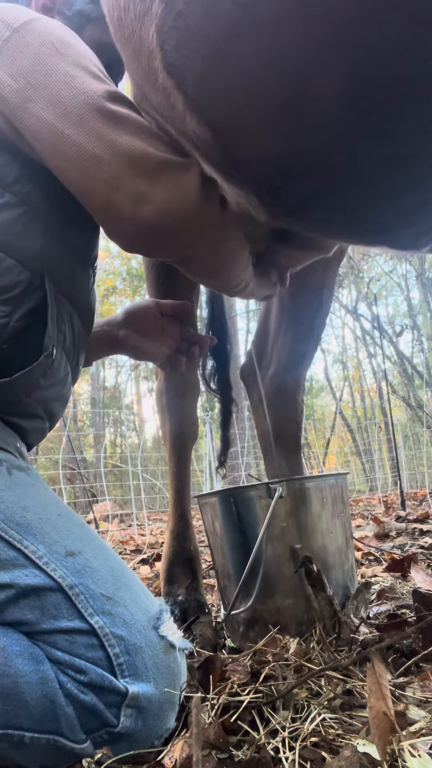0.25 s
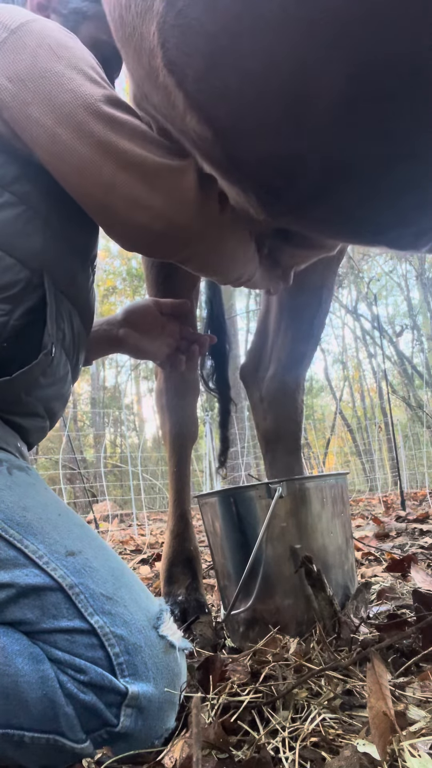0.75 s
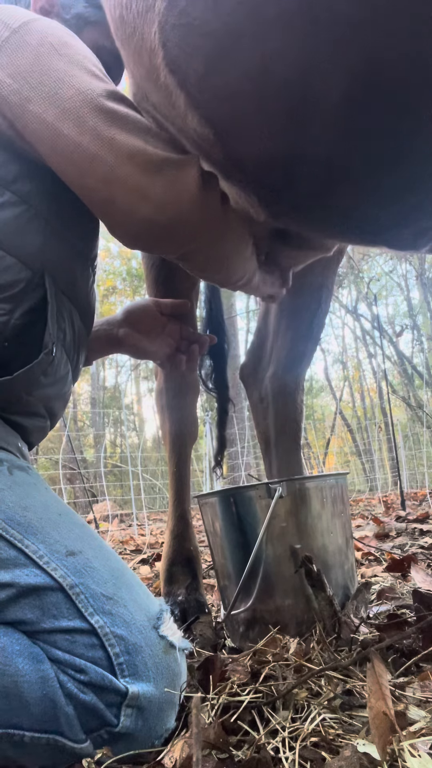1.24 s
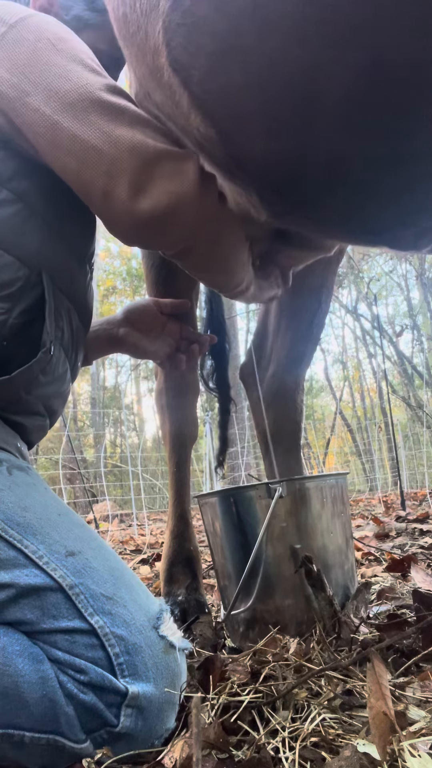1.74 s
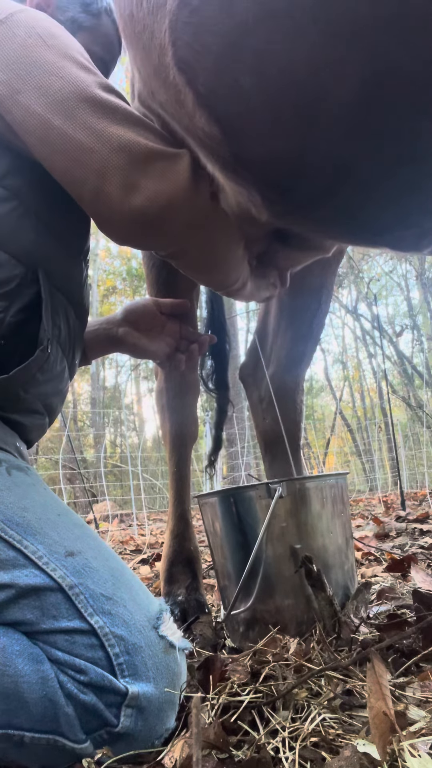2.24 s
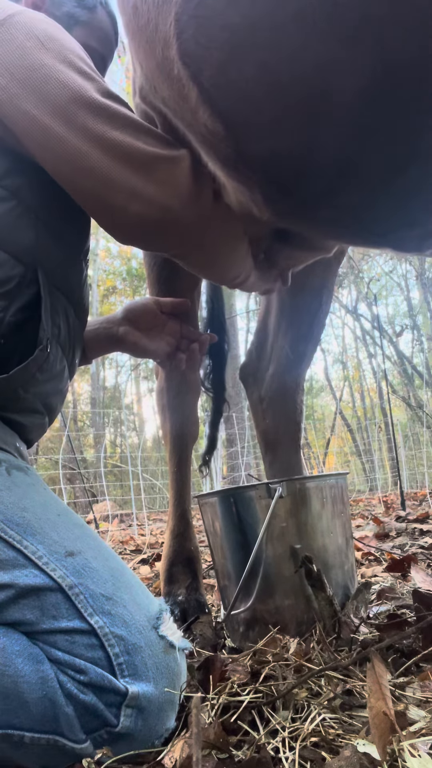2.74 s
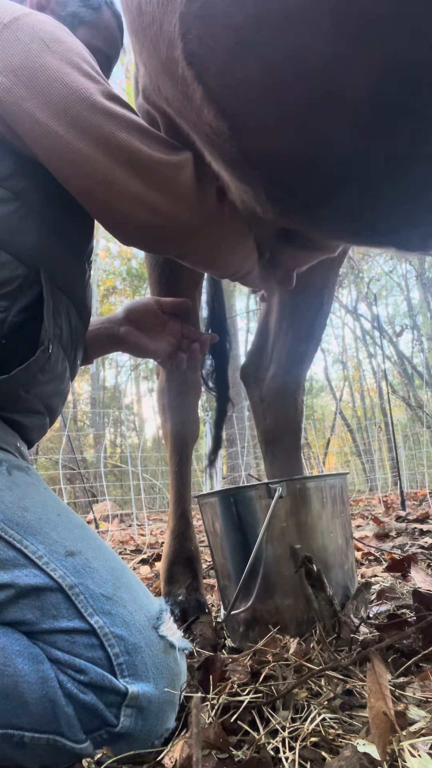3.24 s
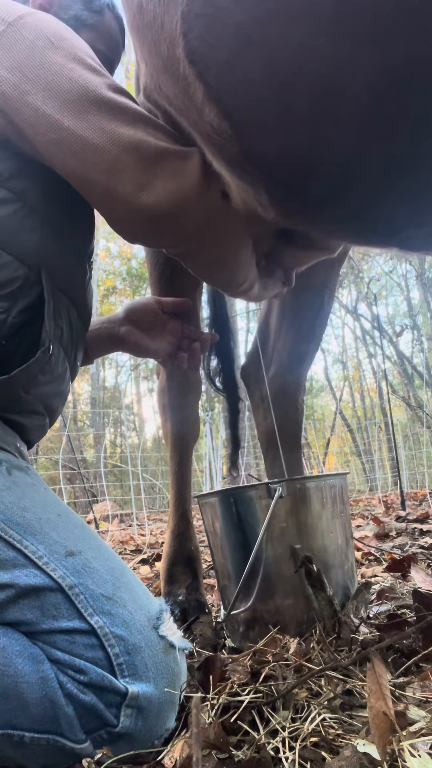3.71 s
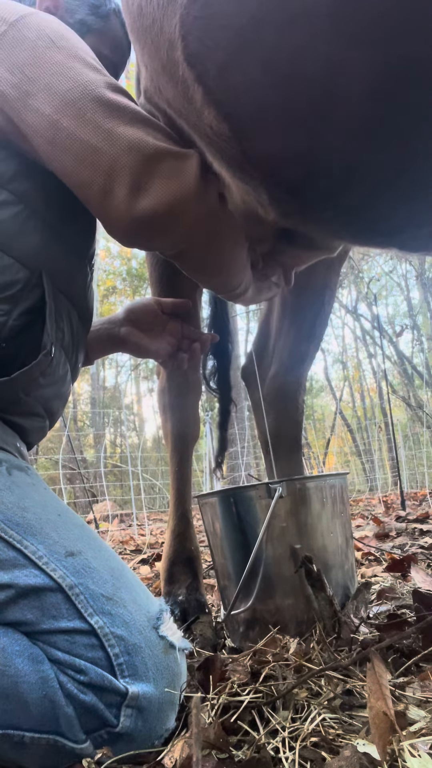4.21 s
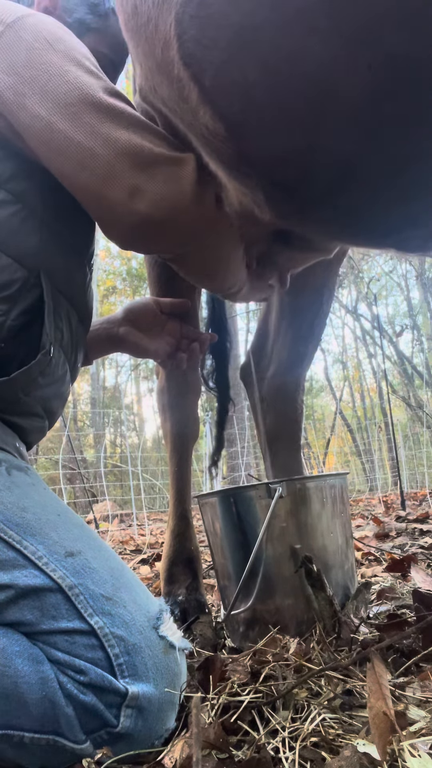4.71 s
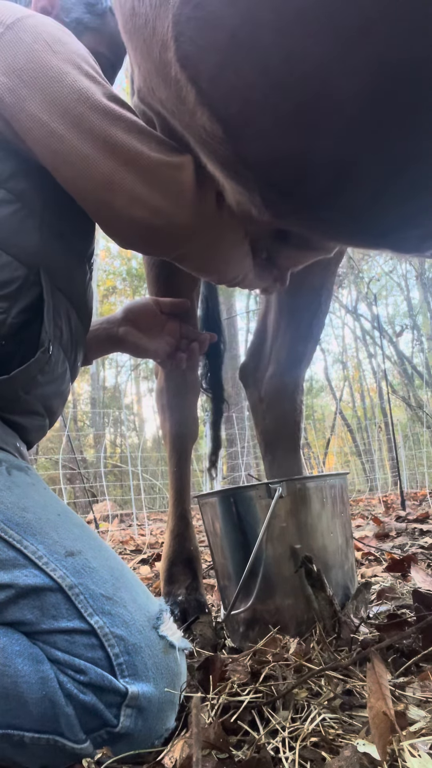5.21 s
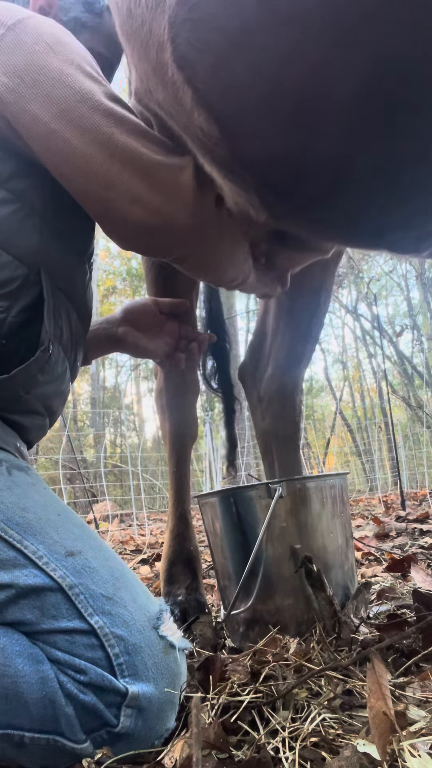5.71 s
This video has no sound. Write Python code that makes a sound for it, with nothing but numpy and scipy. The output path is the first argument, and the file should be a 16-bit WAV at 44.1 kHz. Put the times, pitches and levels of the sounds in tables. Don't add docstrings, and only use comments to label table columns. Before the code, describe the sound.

Jets of milk squirt rhythmically into a metal pail, each hissing, slapping the steel wall and ending in a hollow gurgle, outdoors in a quiet wood.

```python
import sys
import numpy as np
from scipy import signal
from scipy.fft import rfft, irfft, next_fast_len
from scipy.io import wavfile
from scipy.ndimage import uniform_filter1d

SR = 44100
rng = np.random.default_rng(int(sys.argv[2]) if len(sys.argv) > 2 else 0)


def to_wav(sig):
    pcm = np.clip(np.atleast_2d(sig), -1, 1) * 32767
    pcm = np.round(pcm).astype(np.int16)
    wavfile.write(sys.argv[1], SR, pcm.T)


def gain_from_db(level_db):
    decades = np.asarray(level_db, float) / 20
    return 10 ** decades


N = 262836

# hz, level_db
WOOD_COLOUR = [(100, -0.5), (160, 4), (500, -21.5), (1000, -14), (1700, -23.5), (2600, -7.5), (3200, -9.5),
               (3900, -7.5), (4700, -11.5), (8000, -19), (15500, -18)]
# time_s, level_db
WOOD_LEVEL = [(0, -54), (.2, -59), (.85, -69), (1.5, -65), (2.1, -61), (2.75, -63.5), (3.4, -62), (4, -67),
              (4.65, -67.5), (5.3, -66.5), (5.96, -63.5)]
# hz, level_db
RUMBLE_COLOUR = [(15, -52), (27, -55), (55, -0.5), (91, 3.5), (156, -3.5), (210, -6), (260, -5.5),
                 (340, -15), (570, -120)]
# time_s, level_db
RUMBLE_LEVEL = [(0, -73), (.5, -60.5), (2.2, -61.5), (3.3, -60.5), (3.95, -54), (4.5, -61.5), (5.96, -63.5)]
# time_s, pitch_hz, level_db
BIRD_WHISTLE = [
    (1.95, 3440, -84),
    (2.02, 3560, -72),
    (2.11, 3730, -71),
    (2.19, 3830, -76),
]

# start_s, peak_db
DROPLET_TICKS = [(0.0187, -60), (0.6494, -57), (0.681, -47), (1.328, -54), (1.9794, -65), (3.5902, -23.5),
                 (3.785, -40.5), (3.8286, -55), (3.8817, -44.5), (5.352, -46), (0.692, -50), (0.712, -49.5),
                 (1.893, -39.5), (2.194, -49), (2.9236, -34.5), (4.011, -58), (5.191, -69), (5.749, -62),
                 (5.088, -43), (5.1455, -47.5), (5.7903, -48.5)]
# peak_time_s, peak_db, pitch_hz
DROPLET_SNAPS = [(0.0012, -42, 3530), (0.0025, -43.5, 740), (0.021, -43, 3590), (0.324, -39, 5200),
                 (0.5673, -38, 1730), (0.6792, -47, 1555), (1.0763, -38, 10450), (1.198, -49, 1500),
                 (1.3295, -40, 2231), (1.5984, -37, 9700), (1.737, -32, 10200), (1.828, -43, 5370),
                 (2.4934, -39, 5483), (2.926, -29.5, 9600), (3.7873, -34, 9097), (3.832, -38, 10000),
                 (4.195, -32, 1510), (4.4136, -42, 6000), (4.61, -48, 2170), (4.7396, -41, 6004),
                 (4.7938, -30.5, 9100), (4.799, -20.5, 1700), (4.8317, -30.5, 8600), (5.1468, -47, 3800),
                 (5.4047, -41, 6330), (5.791, -46.5, 4930)]
SNAP_S = 0.00082

# start_s, peak_db, pitch_hz
FROTH_BUBBLES = [(0.0, -39, 608), (0.351, -47, 650), (0.477, -44, 497), (1.052, -41, 636), (1.08, -28, 610),
                 (1.625, -33.5, 372), (1.735, -27, 362.6), (1.765, -28.5, 359.5), (2.22, -38, 1900),
                 (2.947, -39, 620), (3.119, -38.5, 494), (3.631, -38, 667), (3.779, -38, 560),
                 (4.197, -36, 514), (4.794, -43, 490), (0.02, -43, 635), (0.96, -40.5, 373),
                 (1.12, -35, 633), (1.205, -36.5, 308), (1.55, -48, 377), (1.74, -38, 626),
                 (1.79, -34.5, 330), (1.82, -51, 367), (2.0, -43, 246), (2.5, -40, 586),
                 (4.454, -45.5, 368), (5.676, -38, 349)]
# start_s, peak_db, pitch_hz
SLOW_BUMPS = [
    (2.098, -37, 153),
    (3.781, -28, 436),
    (5.111, -31, 170),
]
# start_s, peak_db, pitch_hz, ring_s
AIR_GULPS = [(0.307, -43.5, 388, 0.016), (0.411, -39, 395, 0.029), (0.449, -35.5, 450, 0.018),
             (0.489, -33, 390, 0.023), (0.514, -27, 377, 0.018), (0.544, -32.5, 396, 0.015),
             (0.569, -48, 400, 0.018), (0.616, -35.5, 377, 0.024), (0.633, -30.5, 382, 0.021),
             (1.005, -39.5, 382, 0.014), (1.084, -36.5, 293, 0.024), (1.099, -29.5, 360, 0.016),
             (1.144, -33, 362, 0.025), (1.179, -33, 322, 0.026), (2.273, -42.5, 377, 0.029),
             (2.286, -37, 387, 0.014), (2.32, -27, 375, 0.015), (2.352, -29, 334, 0.013),
             (2.368, -30.5, 322, 0.017), (2.404, -31.5, 300, 0.015), (2.429, -28, 342, 0.016),
             (2.449, -31, 347, 0.02), (2.916, -41, 389.7, 0.056), (3.004, -28, 352, 0.013),
             (3.011, -42, 344, 0.0082), (3.037, -38, 374, 0.0076), (3.055, -26.5, 354, 0.0087),
             (3.096, -33, 340, 0.016), (3.544, -31.5, 370.4, 0.041), (3.575, -40, 377, 0.035),
             (3.602, -29.5, 373, 0.036), (3.638, -29, 330, 0.012), (3.689, -40, 347, 0.018),
             (3.747, -35, 312, 0.046), (4.153, -33.5, 373, 0.038), (4.241, -39.5, 371, 0.036),
             (4.312, -62, 363, 0.028), (4.366, -48, 342, 0.028), (4.404, -37.5, 333, 0.016),
             (4.729, -38.5, 411, 0.014), (4.744, -35, 394, 0.018), (4.8, -30.5, 363.3, 0.047),
             (4.884, -34.5, 362, 0.019), (4.909, -36, 366, 0.017), (4.928, -30.5, 372, 0.018),
             (5.455, -35, 381, 0.024), (5.514, -38, 358, 0.018), (5.532, -34, 368, 0.032),
             (5.554, -33.5, 380, 0.019), (5.612, -35.5, 352, 0.026)]
COLUMN_HZ = 372
GULP_RISE_S, GULP_DB = 0.0035, -2

# start_s, peak_db, pitch_hz
WALL_KNOCKS = [(0.233, -41, 1950), (0.301, -36, 1370), (0.324, -38, 1870), (0.391, -42, 1766),
               (0.479, -39, 1346), (0.566, -44, 1940), (1.007, -44, 1700), (1.021, -35, 1473),
               (1.598, -39.5, 2220), (1.615, -34, 956), (1.655, -33.5, 1490), (2.259, -40, 1630),
               (2.296, -25, 1460), (2.399, -41, 935), (2.934, -34, 1610), (2.946, -28, 1460),
               (2.977, -26.5, 1460), (3.482, -38, 1190), (3.534, -34, 1950), (3.598, -34.5, 980),
               (3.65, -35.5, 920), (3.681, -40.5, 840), (3.763, -42, 990), (4.151, -38, 1950),
               (4.194, -29.5, 1450), (4.407, -42, 910), (4.799, -34, 1830), (4.843, -30, 1430),
               (5.446, -30.5, 2220), (5.497, -28, 1600)]
# start_s, peak_db, pitch_hz
WALL_DRIPS = [(0.743, -48, 1440), (1.226, -41.5, 2120), (1.269, -38.5, 2030), (2.5, -37.5, 2205),
              (2.615, -51, 1580), (4.0905, -51, 1170), (5.143, -48, 950), (5.789, -46, 1900),
              (0.955, -42.5, 885), (1.399, -65, 954), (1.884, -45, 930), (1.966, -48, 1200),
              (2.53, -51, 2240), (4.471, -55, 1500), (4.519, -58, 1060), (4.012, -53, 935)]
# start_s, peak_db, pitch_hz
LIGHT_WALL_KNOCKS = [(0.289, -45, 1390), (0.349, -37, 2220), (0.412, -28.5, 1890), (0.448, -34, 1460),
                     (0.593, -43, 695), (0.614, -34.5, 1190), (0.69, -45.5, 1460), (0.937, -39, 2180),
                     (1.317, -43.5, 1650), (2.269, -33.5, 1460), (2.334, -35, 1740), (2.426, -37.5, 930),
                     (2.663, -47, 1420), (2.865, -42, 1560), (2.926, -31, 1660), (3.017, -32.5, 970),
                     (3.032, -38, 2240), (3.516, -40.5, 1650), (3.548, -27.5, 1190), (3.865, -46, 840),
                     (4.168, -30, 1600), (4.21, -31.5, 2250), (4.245, -29.5, 930), (4.271, -33, 1735),
                     (4.318, -50, 947), (3.832, -43.5, 1595), (4.774, -48, 1530), (4.811, -31, 1970),
                     (4.833, -33, 1330), (4.889, -37, 835), (4.973, -41, 2220), (5.097, -45, 960),
                     (5.852, -51, 2350)]
# start_s, peak_db, centre_hz
SPRAY_BURSTS = [(0.2325, -35.5, 6560), (0.322, -27.5, 7400), (0.3595, -26.5, 5360), (0.4005, -25, 6760),
                (0.4014, -22, 3400), (0.5526, -23.5, 5600), (1.05, -25, 3200), (1.221, -32.5, 6300),
                (1.5953, -30.5, 5250), (1.6491, -26, 3320), (1.6824, -22.5, 3300), (2.3144, -32.5, 4960),
                (2.4074, -34, 5400), (2.4987, -34, 9700), (2.8665, -26, 4700), (2.9984, -25.5, 6100),
                (3.4642, -28.5, 7160), (3.4795, -27.5, 6540), (3.491, -28, 9000), (3.5376, -21, 8360),
                (3.5788, -27.5, 6950), (3.772, -28, 9100), (4.1937, -27.5, 7500), (4.4124, -34.5, 8900),
                (4.7379, -28.5, 11200), (4.7974, -23, 3320), (4.83, -21, 3300), (5.3878, -32, 6300),
                (5.433, -29, 9200), (5.5126, -27, 6460)]
# start_s, peak_db, centre_hz
STRAY_DRIPS = [(0.015, -31, 3380), (0.603, -40, 8800), (0.681, -44, 5950), (1.2335, -33, 7830),
               (1.287, -35.5, 6300), (1.318, -40, 2350), (1.328, -33.5, 3300), (2.9237, -49, 6700),
               (3.2586, -39, 8200), (4.1082, -33, 8200), (4.5214, -41.5, 7350), (4.718, -37.5, 10200),
               (5.1455, -39.5, 3500), (5.723, -42, 6170), (5.789, -43, 4860), (5.861, -44.5, 3370)]
# start_s, peak_db, centre_hz
FINE_DROPLETS = [(0.2675, -36, 6300), (0.2884, -29.5, 2900), (0.409, -23.5, 3670), (0.413, -23, 4200),
                 (0.4443, -27.5, 4820), (0.454, -29, 5600), (0.9313, -29.5, 6160), (0.9906, -36, 6840),
                 (1.0908, -29.5, 5350), (2.2115, -39, 6310), (2.2235, -27.5, 6320), (2.2394, -36, 6780),
                 (2.2884, -34, 4760), (2.492, -38, 9700), (2.8344, -42, 6300), (2.8612, -37, 5140),
                 (2.88, -36, 8120), (2.969, -25.5, 6400), (3.0263, -28, 8500), (3.0667, -31.5, 5100),
                 (3.552, -42, 8120), (3.654, -34, 7400), (3.6875, -32.5, 7750), (3.7414, -35, 6200),
                 (3.805, -40, 9330), (4.089, -41, 3560), (4.123, -28, 5950), (4.1364, -27.5, 5100),
                 (4.2283, -31, 6060), (4.361, -49, 6220), (4.436, -37, 9200), (4.743, -29, 6870),
                 (4.846, -27, 6500), (4.9033, -30, 3360), (4.9917, -35, 9300), (5.0245, -35, 6430),
                 (5.121, -38.5, 3850), (5.3497, -49, 5600), (5.3812, -37, 7350), (5.495, -27, 6640),
                 (5.5707, -36, 3580), (5.6516, -44, 5790)]
FIRST_SPLAT, FIRST_KNOCK = (-53, 5500), (-59.5, 1340)

# hz, level_db
SPRAY_COLOUR = [(1500, -24), (2500, -2.5), (2950, -2.5), (3600, -4), (5000, -1), (6300, -3), (9000, -2),
                (12000, 4)]
# hz, level_db
SPRAY_ROLLOFF = [(14500, 1), (15500, -1), (16000, -30)]
# hz, width_hz, level_db
PAIL_PEAKS = [(3850, 700, 0), (6450, 600, 2), (9250, 600, 0)]
# hz, width_hz, level_db
WALL_MODES = [(1190, 150, -1.5), (1460, 180, 2), (1640, 114, 2), (1950, 111, 1), (2220, 100, -0.5),
              (2415, 30, -3), (2813, 30, -5)]
# hz, width_hz, level_db
COLUMN_MODES = [(323, 84.4, -3.5), (333.8, 17, 3), (377, 16.6, -4.5), (401, 58, -7)]
# hz, width_hz, level_db
FROTH_MODES = [(173, 93, -3.5), (487.5, 100, -3), (638, 40, 0), (872, 146, -5), (1043, 148, -5.5)]
FIZZ_PER_S, FIZZ_HZ, FIZZ_CYCLES, FIZZ_DB = 900, (704, 2508), 6.0, -6.5

# start_s, length_s, pressure_db (as spray), rise_s, drain_db_per_s
HAND_SQUEEZES = [
    (-0.4, 0.35, -45, .03, 95),
    (0.261, 0.35, -46.5, 0.077, 101),
    (0.9, 0.27, -45.5, 0.083, 57.5),
    (1.549, 0.28, -44, 0.15, 106),
    (2.196, 0.19, -46.5, 0.079, 43),
    (2.821, 0.34, -48.5, 0.0066, 83),
    (3.452, 0.37, -49, 0.035, 149),
    (4.097, 0.28, -48.5, 0.0056, 97),
    (4.729, 0.23, -47, 0.01, 72),
    (5.358, 0.3, -47, 0.029, 49),
]
# slap_delay_s, slap_over_spray_db, hoot_delay_s, hoot_db
JET_LANDINGS = [
    (.1, 5, 0.14, -62),
    (0.14, 9, 0.3, -38.5),
    (.14, 6, 0.39, -42),
    (0.14, 2, 0.2, -38.5),
    (0.12, 5, 0.31, -40),
    (0.168, 14, 0.28, -43),
    (0.128, 12, 0.3, -39),
    (0.136, 8.5, 0.37, -42),
    (0.075, 4.5, 0.43, -39.5),
    (0.13, 12, 0.15, -36.5),
]
# time_s, half_length_s, wall_db, column_db
MILK_SLOPS = [
    (.01, 0.019, -59, -46.5),
    (0.254, 0.14, -66.5, -69),
    (1.391, 0.054, -70.5, -58),
    (4.443, 0.03, -65.5, -51),
    (0.738, 0.029, -61.5, -80),
    (2.018, 0.13, -68, -56),
    (2.658, 0.2, -75, -68),
    (4.038, 0.12, -72.5, -56.5),
    (4.56, 0.19, -74, -79),
    (4.724, 0.019, -63, -53.5),
]
# spray_db, wall_db, column_db
DRIBBLE_LEVELS = [-86.5, -82.5, -75.5]
ONSET_S, ONSET_DB, SAG_DB_PER_S = 0.0012, -8, 23.5
JET_LIFE_S, CUT_S, CUT_DB = 0.397, 0.018, -9
WALL_ONSET_DB, WALL_FOLLOW_DB, SLAP_FADE_S = -16, -0.2, 0.019
COLUMN_ONSET_DB, COLUMN_SLAP_DB = -25, -3.5
HOOT_FADE_DB_PER_S, COLUMN_DRAIN = 61, 1.3

# hz, likeness (0-1), left_minus_right_db, left_lead_rad
PORT_PAIR = [(60, .99, -1, 0), (200, .97, -3.5, 0), (420, .98, -6.5, 0), (750, .35, -6, 0),
             (1050, .65, -1, 1.2), (1350, .55, 1, .6), (1550, .92, .8, -.3), (2300, .88, 0, -.5),
             (2750, .35, 0, -1.9), (3300, .4, 0, -1.4), (4100, .86, -.5, 0), (4800, .2, 0, 0),
             (5600, .72, 0, 0), (6200, .95, 0, -.1), (7700, .91, 0, -.35), (10000, .78, 0, -1.5),
             (12000, .82, 0, -2.45), (13300, .96, 0, -3), (16000, .99, 0, -np.pi)]


def evened(x):
    return x / np.sqrt(np.mean(x ** 2) + 1e-20)


def read(points, hz):
    f, *columns = np.transpose(points)
    return [np.interp(np.log(hz + 1), np.log(f + 1), c) for c in columns]


def curve(rows):
    s, *columns = np.transpose(rows)
    return [np.interp(np.arange(N) / SR, s, c) for c in columns]


def colour(x, points):
    size = next_fast_len(N)
    gain = gain_from_db(read(points, np.fft.rfftfreq(size, 1 / SR))[0])
    return irfft(rfft(x, size) * gain, size)[..., :N]


def ring(x, modes):
    out = 0
    for k, (hz, width, db) in enumerate(modes):
        r = np.exp(-np.pi * width / SR)
        poles = [1, -2 * r * np.cos(2 * np.pi * hz / SR), r * r]
        out = out + (-1) ** k * gain_from_db(db) * signal.lfilter([1 - r, 0, r - 1], poles, x)
    return out


def flicker(rate_hz, depth_db):
    lowpass = signal.butter(2, rate_hz, fs=SR, output="sos")
    slow = signal.sosfilt(lowpass, rng.standard_normal(N))
    return evened(gain_from_db(depth_db * evened(slow)))


def patter(per_s, spread_db, hiss):
    size_db = spread_db * np.minimum(rng.exponential(1, N), 4)
    size = gain_from_db(size_db) * (rng.random(N) < per_s / SR)
    clumps = signal.lfilter([1], [1, -.93], size)
    return evened((evened(clumps) + hiss) * rng.standard_normal((2, N)))


def blotch(x, depth_db, bins, frames):
    z = signal.stft(x, nperseg=256)[2]
    patches = rng.standard_normal(z.shape[1:])
    patches = uniform_filter1d(uniform_filter1d(patches, size=bins, axis=0), size=frames, axis=1)
    return evened(signal.istft(z * gain_from_db(depth_db * evened(patches)), nperseg=256)[1][:, :N])


def add(mix, s, sound):
    part = mix[:, round(s * SR):][:, :sound.shape[1]]
    part += sound[:, :part.shape[1]]


def wood():
    air = blotch(colour(patter(200, 3.6, 2.5), WOOD_COLOUR), 3.2, bins=2, frames=24)
    rumble = evened(colour(rng.standard_normal((2, N)), RUMBLE_COLOUR)) * flicker(11.4, 0.13)
    hz, db = curve(BIRD_WHISTLE)
    t = np.arange(N) / SR
    singing = (t > BIRD_WHISTLE[0][0]) * (t < BIRD_WHISTLE[-1][0])
    bird = gain_from_db(db) * np.sin(2 * np.pi * np.cumsum(hz) / SR) * flicker(80, 4.5) * singing
    return gain_from_db(curve(WOOD_LEVEL)[0]) * air + gain_from_db(curve(RUMBLE_LEVEL)[0]) * rumble + bird


def ticks():
    out, t = np.zeros((2, N)), np.arange(400) / SR
    for (s, db), noise in zip(DROPLET_TICKS, rng.standard_normal((len(DROPLET_TICKS), 2, len(t)))):
        add(out, s, gain_from_db(db - 3.5) * np.exp(-t / 0.003) * noise)
    return signal.sosfilt(signal.butter(2, 1500, "high", fs=SR, output="sos"), out)


def snaps():
    out, t = np.zeros((2, N)), np.arange(-50, 130) / SR
    shape = np.exp(-(t / np.where(t < 0, SNAP_S / 2, SNAP_S)) ** 2)
    for s, db, hz in DROPLET_SNAPS:
        turn = 2 * np.pi * hz * t
        add(out, s + t[0], gain_from_db(db) * shape * np.array([-np.cos(turn), np.sin(turn)]))
    return out


def bubbles(rows, cycles):
    out = np.zeros((2, N))
    for (s, db, hz), turn in zip(rows, rng.random((len(rows), 2, 1))):
        t = np.arange(0, 9 * cycles / hz, 1 / SR)
        u = t * hz / cycles
        add(out, s, gain_from_db(db - 7.0) * u * np.exp(1 - u) * np.sin(2 * np.pi * (hz * t + turn)))
    return out


def gulps():
    out = np.zeros((2, N))
    for s, db, hz, ring_s in AIR_GULPS:
        t = np.arange(0, 3 * ring_s, 1 / SR)
        shape = (1 - np.exp(-t / GULP_RISE_S)) * np.exp(-(t / ring_s) ** 2)
        turn = 2 * np.pi * (hz * t + COLUMN_HZ * s)
        tone = np.array([np.sin(turn), np.cos(turn)])
        add(out, s - GULP_RISE_S / 2, gain_from_db(db + GULP_DB) * shape * tone)
    return out


def first_blobs(db, hz):
    return [(row[0], db, hz) for row in HAND_SQUEEZES if row[0] > 0]


def knocks():
    out, taps, t = np.zeros((2, N)), np.zeros((2, N)), np.arange(2000) / SR
    shape = (1 - np.exp(-t / 0.0013)) * gain_from_db(-60 * t / 0.035)
    light = [(s, db - 5.0, hz) for s, db, hz in LIGHT_WALL_KNOCKS]
    rows = WALL_KNOCKS + WALL_DRIPS + first_blobs(*FIRST_KNOCK) + light
    for (s, db, hz), turn in zip(rows, rng.random((len(rows), 2, 1))):
        cycles = hz * t * (1 + 1.4 * t)
        add(out, s, gain_from_db(db) * shape * np.sin(2 * np.pi * (cycles + turn)))
        add(taps, s, gain_from_db(db) * shape[None] ** 2)
    splash = taps * rng.standard_normal((2, N))
    return gain_from_db(1.0) * out + gain_from_db(18.5) * ring(splash, WALL_MODES) + gain_from_db(10.5) * ring(splash, [(1700, 1100, 0)])


def splats():
    out, t = np.zeros((2, N)), np.arange(1500) / SR
    shape = (1 - np.exp(-t / 0.00078)) * np.exp(-t / 0.0034)
    fine = [(s, db - 2.0, hz) for s, db, hz in FINE_DROPLETS]
    rows = SPRAY_BURSTS + STRAY_DRIPS + first_blobs(*FIRST_SPLAT) + fine
    for (s, db, hz), noise in zip(rows, rng.standard_normal((len(rows), 2, len(t)))):
        spot = evened(ring(noise, [(hz, 450, 0), (1.336 * hz, 500, -4)]))
        halo = evened(ring(noise, [(hz, 2000, 0)]))
        add(out, s, gain_from_db(db - 5.5) * shape * (0.25 * noise + 0.45 * halo + 0.7 * spot))
    return colour(out, SPRAY_COLOUR + SPRAY_ROLLOFF)


def fizz(count):
    out = np.zeros((2, N))
    for hz in np.geomspace(*FIZZ_HZ, count):
        u = np.arange(0, 5 * FIZZ_CYCLES / hz, 1 / SR) * hz / FIZZ_CYCLES
        grain = u * np.exp(-2 * u) * np.sin(2 * np.pi * FIZZ_CYCLES * u * (1 + .06 * u))
        chance, size = rng.random((2, 2, N), dtype=np.float32)
        born = (chance < FIZZ_PER_S / count / SR) * gain_from_db(12.0 * size)
        out += signal.oaconvolve(born, grain[None] * np.sqrt(hz), axes=1)[:, :N]
    return evened(out)


def squeeze(start, length, pressure_db, rise, drain, slap, slap_db, hoot, hoot_db):
    u = np.arange(N) / SR - start
    on = np.clip(u / ONSET_S + 1, 0, 1) ** 2
    late = np.maximum(u - length, 0)
    spray_db = pressure_db + ONSET_DB * np.clip(1 - u / rise, 0, 1) - SAG_DB_PER_S * u - drain * late
    spray_db = spray_db + CUT_DB * np.clip((u - JET_LIFE_S) / CUT_S, 0, 1)
    climb = WALL_ONSET_DB + (slap_db - WALL_ONSET_DB) * np.clip(u / slap, 0, 1)
    follow = WALL_FOLLOW_DB + slap_db * np.exp(-abs(u - slap) / SLAP_FADE_S)
    wall_db = spray_db + np.where(u < slap, climb, follow)
    turns_s = [0, slap, max(hoot, slap + ONSET_S)]
    column_db = hoot_db + np.interp(u, turns_s, [COLUMN_ONSET_DB, COLUMN_SLAP_DB, 0])
    column_db = column_db - HOOT_FADE_DB_PER_S * np.maximum(u - hoot, 0) - COLUMN_DRAIN * drain * late
    return on * gain_from_db(np.array([spray_db, wall_db, column_db]))


def flow_db():
    gains = sum(squeeze(*hand, *landing) for hand, landing in zip(HAND_SQUEEZES, JET_LANDINGS))
    t = np.arange(N) / SR
    for s, half, wall_db, column_db in MILK_SLOPS:
        gains = gains + np.outer([0, gain_from_db(wall_db), gain_from_db(column_db)], np.exp(-((t - s) / half) ** 2))
    return 20 * np.log10(gains + gain_from_db(np.array(DRIBBLE_LEVELS))[:, None])


def jets():
    spray_db, wall_db, column_db = flow_db()
    froth_db = 0.46 * wall_db + 0.44 * column_db - 10.0
    drops = colour(patter(3200, 3.4, 0.72), SPRAY_COLOUR + SPRAY_ROLLOFF)
    drops = drops + 0.8 * sum(ring(drops, [peak]) for peak in PAIL_PEAKS)
    gusts = blotch(drops, 2.4, bins=16, frames=3)
    spray = blotch(gusts, 4.2, bins=1, frames=10) * flicker(70, .8)
    blows = patter(1500, 1.8, .9) * flicker(25, 1.3)
    wall = blotch(ring(blows, WALL_MODES), 3.8, bins=1, frames=8)
    column = evened(ring(rng.standard_normal((2, N)) * flicker(55, 0.15), COLUMN_MODES))
    froth = blotch(ring(patter(900, 2.5, 1.1), FROTH_MODES), 4.2, bins=1, frames=8)
    out = gain_from_db(spray_db + 2.5) * spray + gain_from_db(wall_db - 4.0) * wall + gain_from_db(column_db - 7.0) * column
    return out + gain_from_db(froth_db) * froth + gain_from_db(wall_db + FIZZ_DB) * fizz(count=14)


def scene():
    lumps = gulps() + bubbles(FROTH_BUBBLES, 3.57) + bubbles(SLOW_BUMPS, 0.89)
    return wood() + ticks() + snaps() + lumps + knocks() + splats() + jets()


def low_pass(x):
    return signal.sosfilt(signal.butter(12, 15730, fs=SR, output="sos"), x)


def record(dry):
    size = next_fast_len(N)
    same, balance_db, lead = read(PORT_PAIR, np.fft.rfftfreq(size, 1 / SR))
    same = np.clip(same, 0, 1)
    a, b = rfft(dry, size)
    half = gain_from_db(balance_db / 2) * np.exp(.5j * lead)
    left = a * half
    right = (same * a + np.sqrt(1 - same ** 2) * b) / half
    mix = irfft(np.array([left, right]), size)[:, :N]
    return low_pass(mix)


dry = scene()
out = record(dry)
to_wav(out)
```